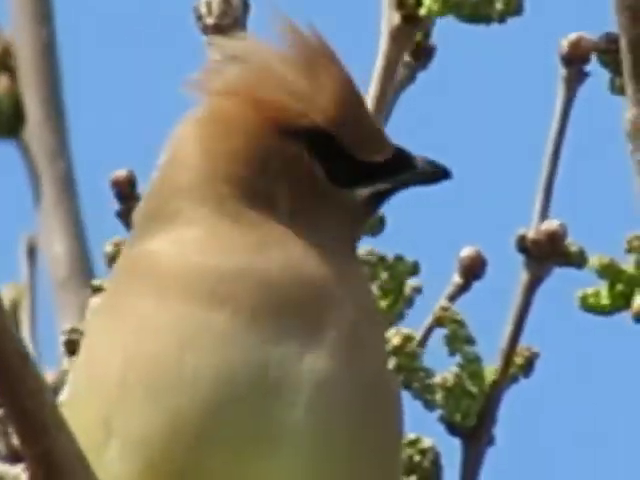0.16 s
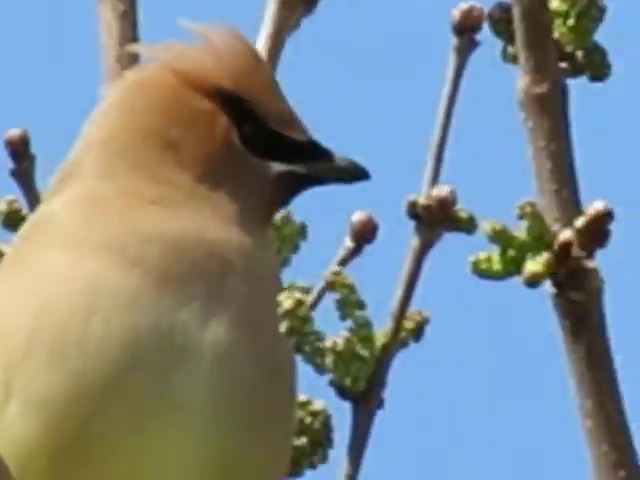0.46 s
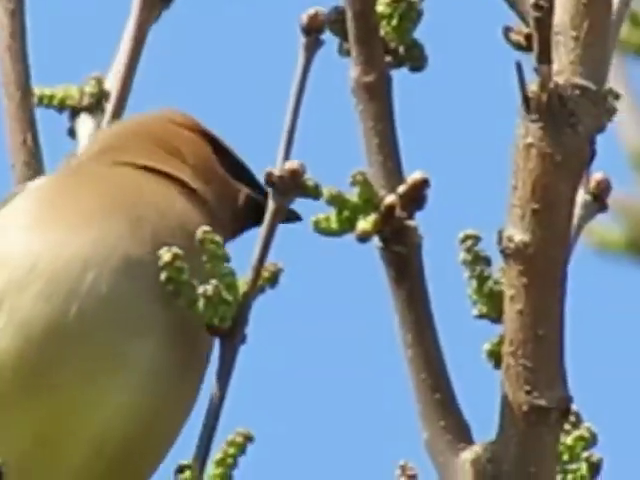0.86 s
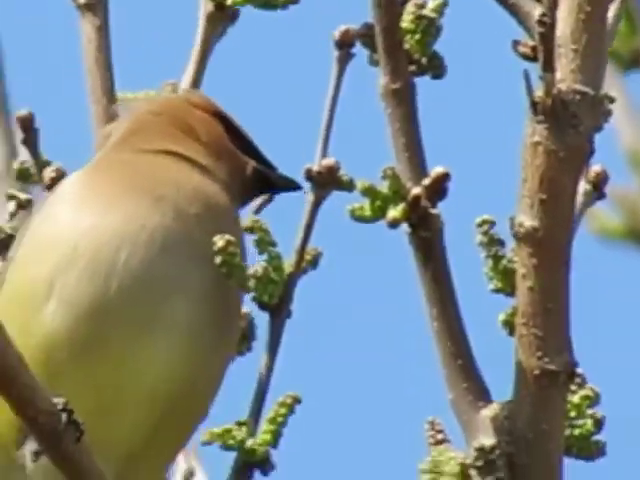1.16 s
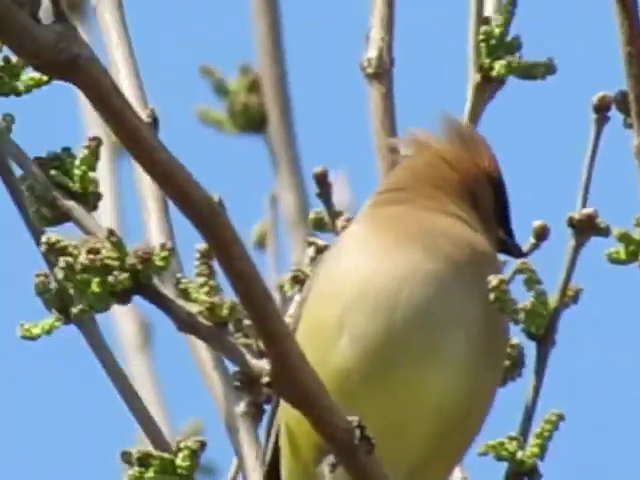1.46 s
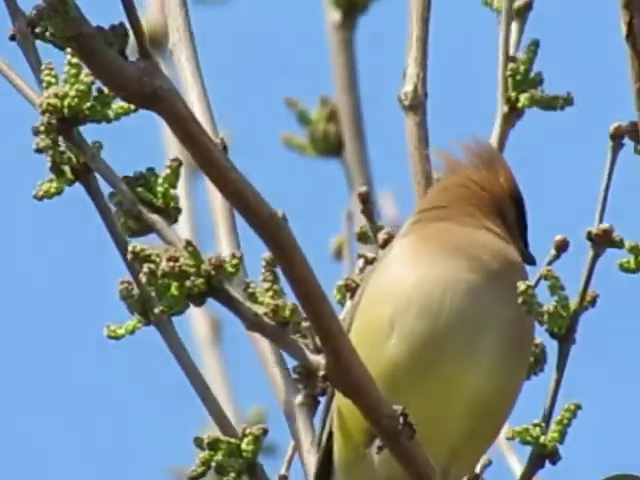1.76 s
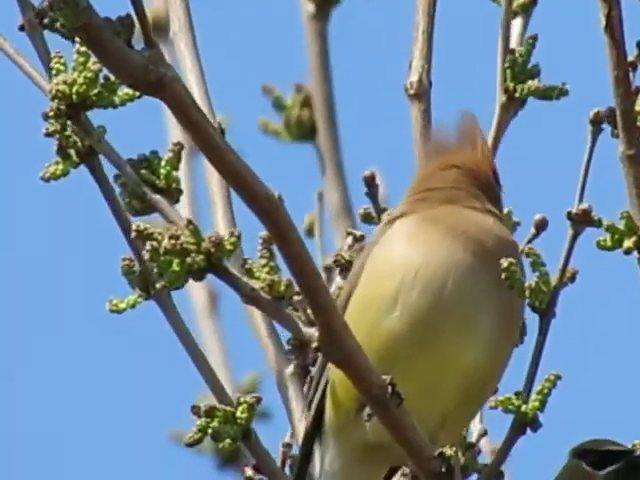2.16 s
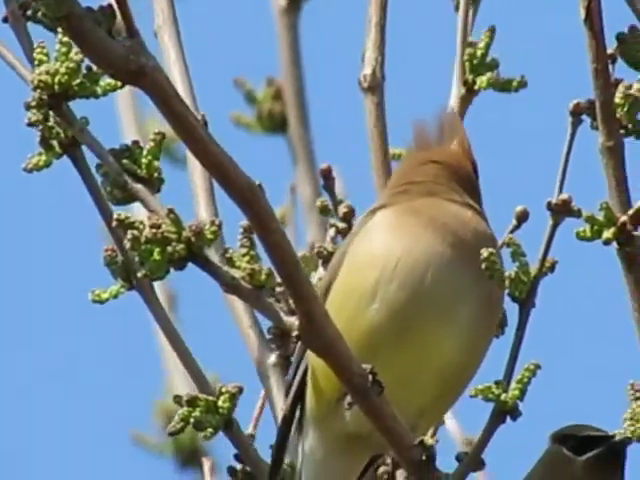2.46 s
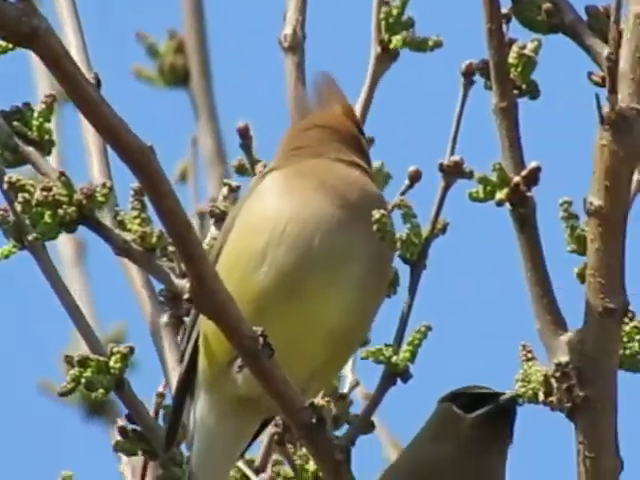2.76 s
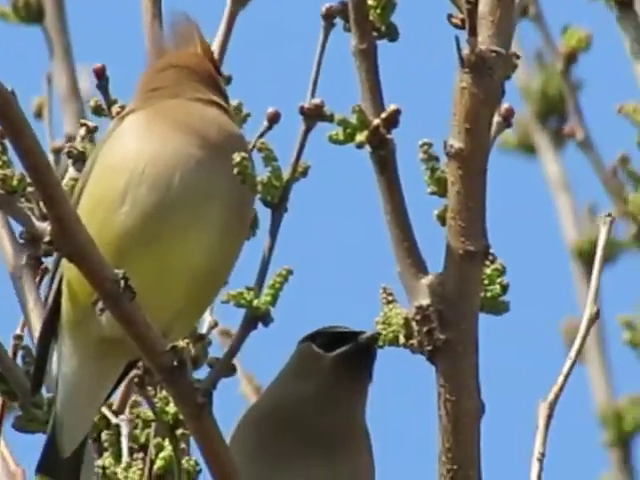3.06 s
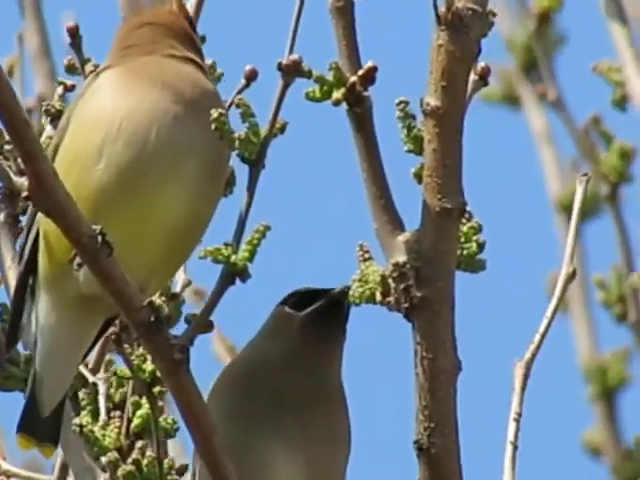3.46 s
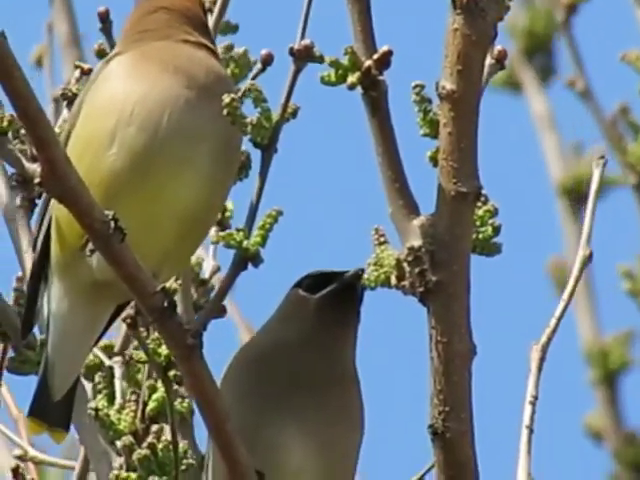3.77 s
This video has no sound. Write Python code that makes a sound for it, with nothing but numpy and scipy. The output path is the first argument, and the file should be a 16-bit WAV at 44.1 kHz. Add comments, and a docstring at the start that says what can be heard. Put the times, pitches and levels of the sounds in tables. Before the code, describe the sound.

Waxwings trade faint, piercing pure whistles outdoors, with two quick sparrow-like chirps and a click.

```python
"""Distant traffic rumbles throughout, swelling slightly and growing duller (shaped random spectra).
Waxwings in a tree trade thin rising and falling whistles near 7 kHz, near-pure gliding tones, from the start.
A sparrow-like bird chirps at once and again at 0.7 s: a hoarse rasp, then a fast warble that nearby walls throw
back. A puff of hiss lies under the first rasp; later ones, shaped noise, sound like rustling twigs.
At 1.5 s the camera body gives a faint tick, a loud one and a duller bounce: damped modes and a noise crack."""
import sys
import numpy as np
from scipy import signal
from scipy.fft import rfft, irfft
from scipy.io import wavfile
from scipy.ndimage import uniform_filter1d

SR = 44100
rng = np.random.default_rng(int(sys.argv[2]) if len(sys.argv) > 2 else 0)


def gain_from_decibels(decibels):
    """Convert decibel values to linear amplitude factors."""
    exponent = np.asarray(decibels, float) / 20
    return 10 ** exponent


def bounce(signal):
    """Save signal as a 16-bit WAV file at the path given by the first command-line argument."""
    frames = np.transpose(np.atleast_2d(signal))
    limited = np.clip(frames, -1, 1)
    pcm = np.round(limited * 32767).astype(np.int16)
    wavfile.write(sys.argv[1], SR, pcm)


N = 172431


def evened(x):
    """Scales to rms 1."""
    return x / np.sqrt(np.mean(x ** 2) + 1e-20)


def read(points, hz):
    """Reads a spectrum on a log-frequency axis."""
    f, value = np.transpose(points)
    return np.interp(np.log(hz + 1), np.log(f + 1), value)


def add(mix, s, sound):
    """Mixes a sound in at s seconds, in place."""
    part = mix[..., round(s * SR):][..., :sound.shape[-1]]
    part += sound[..., :part.shape[-1]]


def slow(top_hz):
    """Random wander: noise low-passed at top_hz, rms 1."""
    return evened(signal.lfilter(*signal.butter(2, top_hz, fs=SR), rng.standard_normal(N)))


def space(x, t60_s, unlike):
    """Scattered echoes from branches and walls: sparse decaying taps of random sign, partly unlike per channel."""
    length = SR // 2
    slots = np.arange(200, length - 30, 30)
    at = slots + rng.integers(0, 30, (2, len(slots)))
    taps = np.zeros((2, length))
    np.put_along_axis(taps, at, rng.choice([-1., 1.], at.shape), 1)
    taps = taps[0] + [[unlike], [-unlike]] * taps[1]
    taps *= gain_from_decibels(-60 * np.arange(length) / SR / t60_s)
    taps /= np.linalg.norm(taps, axis=1)[:, None]
    return signal.fftconvolve(x[None], taps, axes=1)[:, :N]


def ports(x, left_db, lead_s):
    """One sound at two microphone ports: the left a little louder and earlier."""
    delay = np.exp(-2j * np.pi * np.fft.rfftfreq(N, 1 / SR) * lead_s)
    late = irfft(rfft(x) * delay, N)
    return np.array([gain_from_decibels(left_db / 2) * x, gain_from_decibels(-left_db / 2) * late])


def sing(rows):
    """Pitch in Hz and one gated gain per level column of a note, interpolated between its rows."""
    s, hz, *levels_db = np.transpose(rows)
    t = np.arange(N) / SR
    attack_s, release_s = 0.0029, 0.0092
    gate = np.clip((t - s[0]) / attack_s, 0, 1) * np.clip((s[-1] - t) / release_s + 1, 0, 1)
    gains = [np.sqrt(2) * gate * gain_from_decibels(np.interp(t, s, db)) for db in levels_db]
    return np.interp(t, s, hz), gains


def traffic():
    """Random short-time spectra, mid and side, with faint patches, a slow swell and a tilt that dulls with time."""
    # Each row: frequency in Hz, relative spectral level in dB.
    spectrum = [(12, -59), (20, -32), (32, -62.5), (50, -9), (69, -1), (120, -2), (182, -13.5), (261, -7.5),
                (354, -10), (441, -17.5), (565, -11), (705, -14), (982, -12.5), (1850, -25), (6600, -51),
                (12800, -62.5), (14700, -62)]
    # Each row: frequency in Hz, side level relative to mid in dB.
    spread = [(60, -70), (110, -22.5), (200, -12), (370, -6.5), (680, -11.5), (1250, -10.5), (2300, -7),
              (4230, -2.5), (7760, 2.5), (14300, 1)]
    # Each row: frequency in Hz, left over right in dB.
    lean_points = [(150, 0.), (300, -.6), (600, .4), (1200, 1.1), (4000, .1)]
    # Dulling as the traffic moves on. Each row: time in seconds, slope about 500 Hz in dB per octave.
    tilt = [(0, 0.36), (1.3, -0.12), (2.6, -0.25), (3.9, -0.51)]
    mid_rms_db, swell_db, swell_hz, patch_db = -36.5, -0.82, 0.46, 1.53
    size, hop = 2048, 512

    frames, hz = N // hop + 5, np.fft.rfftfreq(size, 1 / SR)
    starts = np.arange(frames) * hop
    a, b, c, d, patches = rng.standard_normal((frames, len(hz), 5)).T
    patches = evened(uniform_filter1d(uniform_filter1d(patches, 5, 0), 12, 1))
    swell = np.interp(starts, np.arange(N), slow(swell_hz))
    octaves = np.log2(np.clip(hz, 60, 4000) / 500)
    slope = np.interp(starts / SR, *np.transpose(tilt))

    mid = a + 1j * b
    side = (c + 1j * d) * gain_from_decibels(read(spread, hz))[:, None]
    lean = gain_from_decibels(read(lean_points, hz) / 2)[:, None]
    z = np.array([(mid + side) * lean, (mid - side) / lean])
    level_db = read(spectrum, hz)[:, None] + patch_db * patches + swell_db * swell
    z *= gain_from_decibels(level_db + np.outer(octaves, slope))
    out = signal.istft(z, nperseg=size, noverlap=size - hop)[1][:, :N]
    return gain_from_decibels(mid_rms_db) * out / np.sqrt(np.mean(out.mean(0) ** 2))


def hiss_puffs():
    """Brief soft puffs of grainy hiss: one under the first chirp's lead-in, the rest like rustling twigs."""
    # Each row: start in seconds, length in seconds, level before shaping in dB, centre in Hz, width in Hz.
    puffs = [(.035, .055, -59, 4600, 3000), (.455, .055, -55, 4200, 3000), (0.568, 0.12, -61, 3980, 1500),
             (1.824, 0.034, -54, 2580, 1480), (2.1, 0.14, -66, 4700, 900), (2.49, 0.079, -66, 5100, 1500),
             (2.81, 0.19, -66, 6000, 4000), (3.08, 0.11, -69, 4800, 2200)]
    grain_db, grain_hz, unlike = 3, 110, 0.18
    out = np.zeros((2, N))
    for s, length_s, db, centre_hz, width_hz in puffs:
        n = rng.standard_normal((3, SR // 4))
        limits_hz = [centre_hz - width_hz / 2, centre_hz + width_hz / 2]
        band = signal.butter(3, limits_hz, "bandpass", fs=SR)
        # partly unlike in the two ports
        hiss = evened(signal.lfilter(*band, n[0] + unlike * n[1:]))[:, :round(length_s * SR)]
        shape = np.sin(np.pi * np.linspace(0, 1, hiss.shape[1]) ** 0.78)
        add(out, s, gain_from_decibels(db) * hiss * shape)
    return out * evened(gain_from_decibels(grain_db * slow(grain_hz)))


def ticks():
    """The plastic camera body cracks and rings, in opposite sense at the ports: faint, loud, then a duller bounce."""
    # Each row: start in seconds, level in dB, treble loss in dB per kHz.
    hits = [(1.497, -54, 0.), (1.5048, -34, 1), (1.509, -38, 2.5)]
    # Body modes. Each row: frequency in Hz, left level in dB, right level in dB, 60 dB decay in seconds.
    modes = [(2300, -5, 10, 0.015), (3320, 2, -18, .008), (4300, 8, -16, .006), (5660, 7, -15, .005),
             (10500, 3, -5, .007), (12000, -20, -8, .005)]
    rise_s, crack_db, crack_t60_s = 0.00017, -15, 0.006
    out, t = np.zeros((2, N)), np.arange(2000) / SR
    for s, db, dull in hits:
        ring = np.zeros((2, len(t)))
        for hz, left_db, right_db, t60_s in modes:
            mode_db = np.array([[left_db], [right_db]]) - 60 * t / t60_s - dull * hz / 1000
            ring += gain_from_decibels(mode_db) * np.sin(2 * np.pi * hz * t)
        # the crack loses level as if at 4 kHz
        crack = gain_from_decibels(crack_db - 60 * t / crack_t60_s - 4 * dull) * rng.standard_normal((2, len(t)))
        add(out, s, gain_from_decibels(db) * (ring * [[1], [-1]] + crack) * np.minimum(t / rise_s, 1))
    return out


def sparrow():
    """A fast warble after a soft hoarse rasp near 5 to 6 kHz; faint treble hiss follows the loudness; walls answer."""
    # One list per chirp. Each row: time in seconds, pitch in Hz, level in dB, rasp level before hoarseness in dB.
    chirps = [
        [(0.038, 2590, -70, -57), (0.06, 2700, -66, -54), (0.069, 2900, -50, -48), (0.079, 3100, -50, -55),
         (0.082, 3500, -33, -62), (0.089, 4200, -27, -73), (0.104, 4270, -24.5, -59), (0.115, 4250, -22, -69),
         (0.123, 3260, -30, -58), (0.13, 4660, -29, -73), (0.135, 4670, -33, -68), (0.139, 3333, -20.5, -61),
         (0.147, 3390, -33, -69), (0.16, 3500, -23, -65), (0.167, 4205, -32, -65), (0.176, 3900, -31, -73),
         (0.186, 3500, -23, -70), (0.193, 2600, -38, -81), (0.2, 3150, -37, -82), (0.207, 2700, -41, -82),
         (0.212, 3050, -37, -82), (0.221, 2750, -52, -82)],
        [(0.682, 2620, -70, -66), (0.698, 2640, -66, -52), (0.709, 2700, -58, -53), (0.714, 3000, -48, -56),
         (0.718, 3250, -33, -70), (0.723, 3950, -30, -80), (0.732, 4400, -34, -62), (0.742, 4430, -29, -65),
         (0.751, 4100, -28, -80), (0.76, 3210, -33, -64), (0.766, 4260, -27.5, -67), (0.77, 4730, -36, -63),
         (0.777, 3366, -22, -69.9), (0.786, 3246, -37, -72), (0.794, 3500, -24.5, -55), (0.802, 3980, -38, -81),
         (0.811, 3904, -24.5, -72.7), (0.818, 3850, -33, -68), (0.825, 2700, -39, -82), (0.834, 3200, -34, -70),
         (0.842, 2750, -42, -82), (0.848, 3100, -39, -82), (0.858, 2900, -52, -82)],
    ]
    # Wall echoes. Each row: delay in seconds, level relative to the chirp in dB.
    walls = [(.0022, -8), (.0068, -12), (.0115, -13), (.0165, -13), (.031, -21), (.043, -19), (.075, -27)]
    breath_db, breath_hz, hoarse_hz = -20, 300, 300
    twelfth_db, rasp_overtone_db, hiss_db = -46, -20, -43
    quiver_depth, quiver_hz = 0.009, 120
    wet_db, t60_s = -15, 0.45

    breath, hoarse = slow(breath_hz), slow(hoarse_hz)
    quiver = 1 + quiver_depth * slow(quiver_hz)
    treble_noise = evened(np.diff(rng.standard_normal((2, N + 2)), n=2))
    out, loudness = np.zeros(N), np.zeros(N)
    for rows in chirps:
        hz, (gain, rasp_gain) = sing(rows)
        phase = 2 * np.pi * np.cumsum(uniform_filter1d(hz, 30) * quiver) / SR
        note = (1 + gain_from_decibels(breath_db) * breath) * np.sin(phase) + gain_from_decibels(twelfth_db) * np.sin(3 * phase)
        # set at twice the note's pitch
        rasp = (0.34 + 1.13 * hoarse) * (np.sin(2 * phase) + gain_from_decibels(rasp_overtone_db) * np.sin(4 * phase))
        out += gain * note + rasp_gain * rasp
        loudness += gain
    near = out.copy()
    for delay_s, db in walls:
        add(near, delay_s, gain_from_decibels(db) * out)
    treble_hiss = gain_from_decibels(hiss_db) * uniform_filter1d(loudness, 600) * treble_noise
    direct = ports(near, left_db=0.7, lead_s=0.000013)
    return treble_hiss + direct + gain_from_decibels(wet_db) * space(near, t60_s, unlike=0.42)


def waxwings():
    """Near-pure gliding notes with a faint octave; level and pitch tremble a little."""
    # One list per whistle. Each row: time in seconds, pitch in Hz, level in dB.
    whistles = [
        [(0, 6590, -66), (0.08, 6880, -64), (0.18, 6950, -65), (0.3, 6900, -65), (0.39, 6790, -66),
         (0.415, 6680, -76)],
        [(0.19, 7000, -76), (0.23, 7090, -69), (0.3, 7130, -68), (0.5, 6980, -67), (0.555, 6895, -68),
         (0.57, 6860, -79)],
        [(0.575, 6370, -72), (0.598, 6400, -67), (0.615, 6610, -50), (0.675, 6620, -55), (0.708, 6870, -48),
         (0.794, 7200, -52), (0.81, 7185, -49), (0.915, 7110, -52), (0.946, 7040, -56), (0.968, 6930, -44),
         (0.99, 6300, -70)],
        [(1.42, 6240, -70), (1.436, 6370, -58), (1.48, 6640, -60), (1.524, 7000, -48), (1.548, 7110, -52),
         (1.566, 7080, -61), (1.63, 7280, -44), (1.742, 7245, -43), (1.784, 7220, -60), (1.805, 7040, -47),
         (1.818, 6850, -70)],
        [(1.845, 6500, -72), (1.93, 6730, -67), (2.0, 6815, -64), (2.06, 6800, -64), (2.11, 6650, -71),
         (2.15, 6400, -79)],
        [(1.95, 6880, -78), (2.02, 7120, -72), (2.05, 7200, -82), (2.1, 7250, -70), (2.17, 7240, -66),
         (2.22, 7100, -68), (2.245, 6800, -74)],
        [(2.19, 6260, -68), (2.21, 6390, -55), (2.274, 6525, -54), (2.328, 6745, -48), (2.36, 6950, -54),
         (2.4, 7150, -52), (2.46, 7195, -48), (2.51, 7120, -55), (2.54, 7080, -58)],
        [(2.335, 6760, -60), (2.375, 6910, -46), (2.41, 7000, -73), (2.455, 7030, -70), (2.475, 7000, -52),
         (2.5, 6910, -48), (2.545, 6770, -56), (2.56, 6570, -77)],
        [(2.6, 6690, -76), (2.62, 6720, -66), (2.67, 6770, -66), (2.74, 6790, -72)],
        [(2.665, 6260, -78), (2.69, 6470, -66), (2.73, 6690, -65), (2.78, 6800, -65), (2.88, 6870, -65),
         (2.99, 6850, -61), (3.0, 6740, -70)],
        [(3.41, 6370, -62), (3.425, 6480, -59), (3.47, 6720, -68), (3.49, 6780, -74), (3.535, 6900, -61),
         (3.6, 6800, -65), (3.66, 6830, -72), (3.71, 6720, -62), (3.74, 6445, -79)],
        [(3.44, 6250, -72), (3.48, 6350, -73), (3.53, 6600, -77), (3.58, 6780, -78), (3.615, 6500, -70)],
    ]
    # Octave overtone, one value per whistle: level relative to the note in dB.
    octaves_db = [-38, -38, -27, -31, -40, -36, -29, -36, -40, -38, -20, -13]
    flutter_db, flutter_hz = 2.8, 25
    waver_depth, waver_hz, glide_s = 0.0016, 40, 0.01
    wet_db, t60_s = -12, 0.34

    out = np.zeros(N)
    flutter, waver = slow(flutter_hz), slow(waver_hz)
    for k, (rows, octave_db) in enumerate(zip(whistles, octaves_db)):
        shift = k * SR // 3  # moves each note along the wander
        hz, (gain,) = sing(rows)
        pitch_hz = uniform_filter1d(hz, round(glide_s * SR)) * (1 + waver_depth * np.roll(waver, shift))
        phase = 2 * np.pi * np.cumsum(pitch_hz) / SR
        note = np.sin(phase) + gain_from_decibels(octave_db) * np.sin(2 * phase)
        out += gain * gain_from_decibels(flutter_db * np.roll(flutter, shift)) * note
    direct = ports(out, left_db=1.0, lead_s=0.000002)
    return direct + gain_from_decibels(wet_db) * space(out, t60_s, unlike=0.52)


def scene():
    """Birds over traffic, with puffs of hiss and ticks."""
    return traffic() + hiss_puffs() + ticks() + sparrow() + waxwings()


def top_cut(x):
    """Nothing passes above the cut-off."""
    return signal.sosfilt(signal.butter(12, 14860, fs=SR, output="sos"), x)


def record(dry):
    """Limits the band with a linear-phase low-pass and returns the finished mix."""
    edge_hz = 14550
    low_pass = signal.firwin(255, edge_hz, fs=SR)[None]
    mix = signal.oaconvolve(dry, low_pass, "same")
    return top_cut(mix)


dry = scene()
out = record(dry)
bounce(out)
```